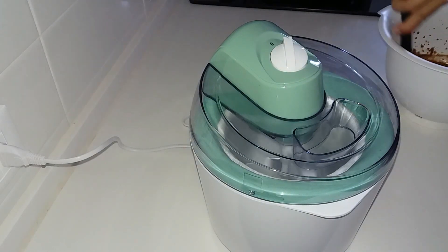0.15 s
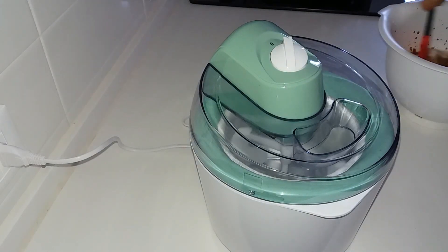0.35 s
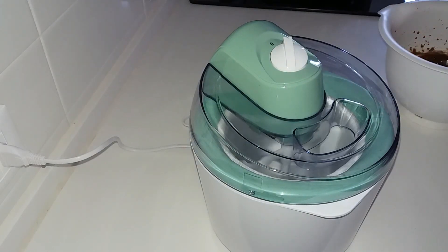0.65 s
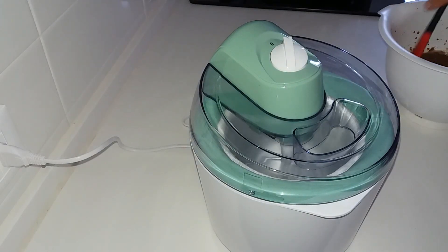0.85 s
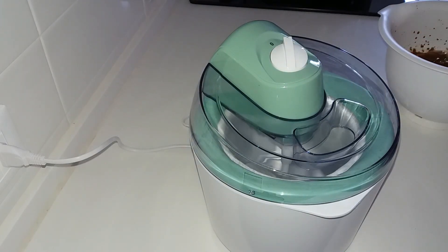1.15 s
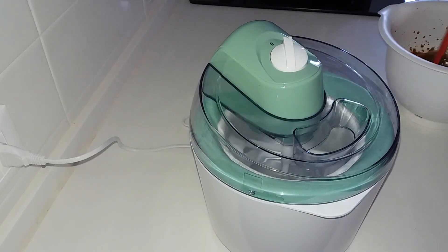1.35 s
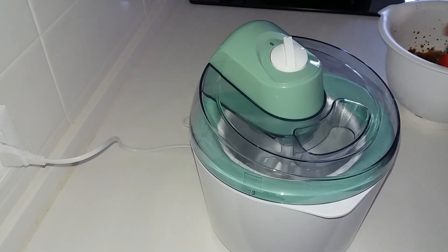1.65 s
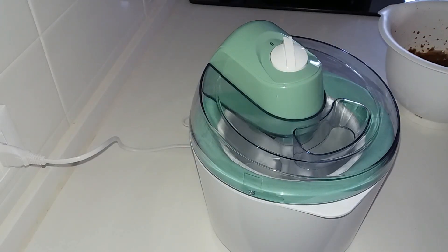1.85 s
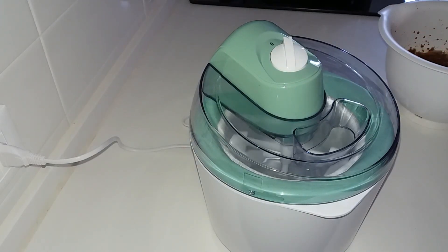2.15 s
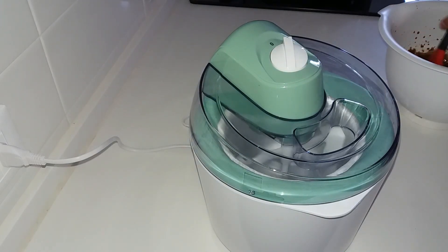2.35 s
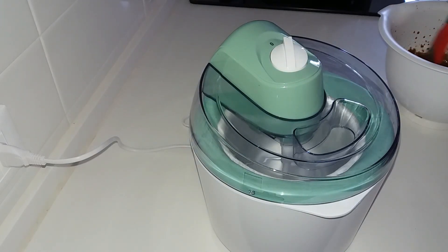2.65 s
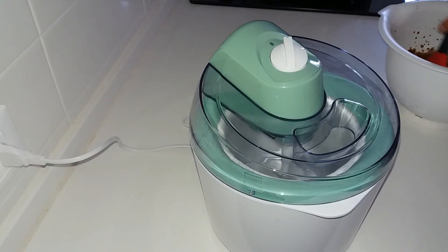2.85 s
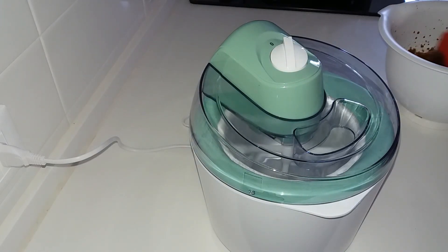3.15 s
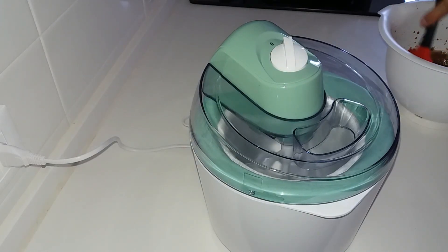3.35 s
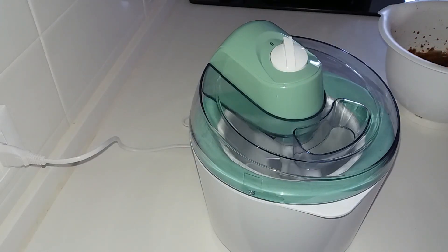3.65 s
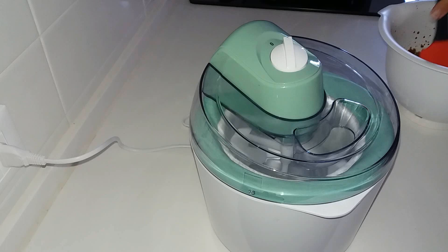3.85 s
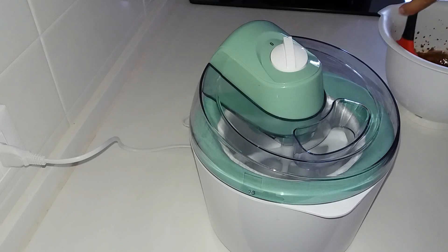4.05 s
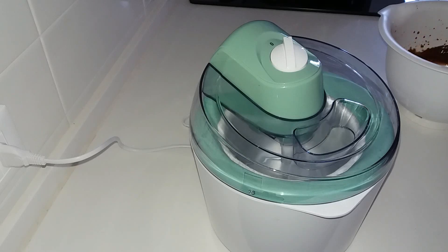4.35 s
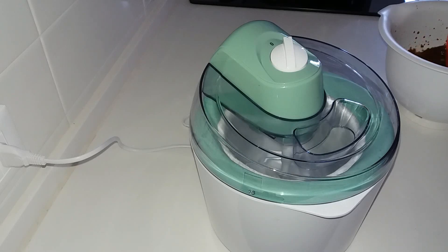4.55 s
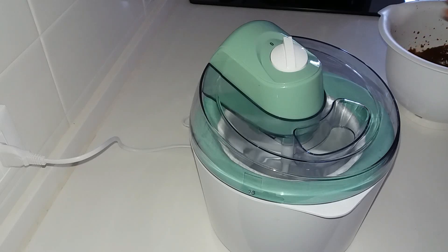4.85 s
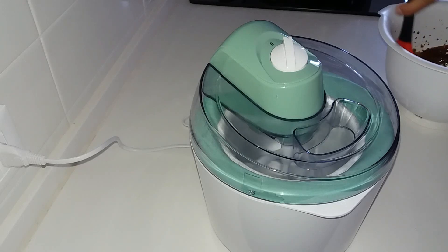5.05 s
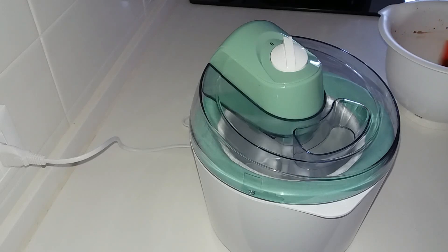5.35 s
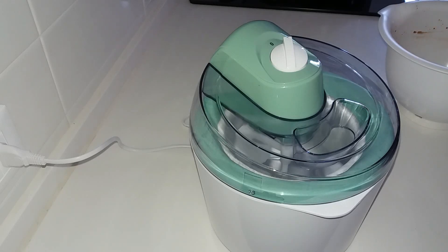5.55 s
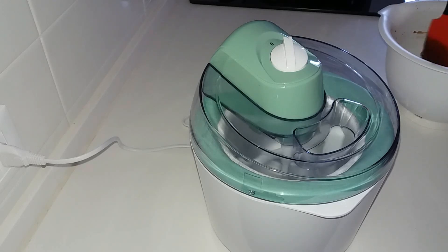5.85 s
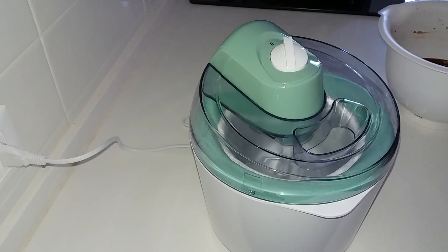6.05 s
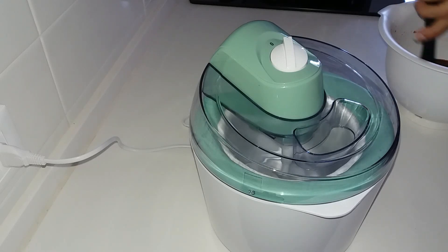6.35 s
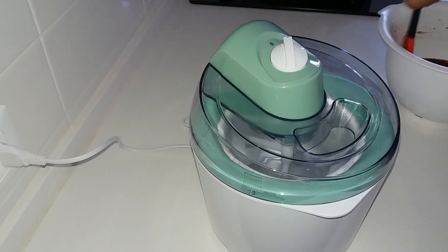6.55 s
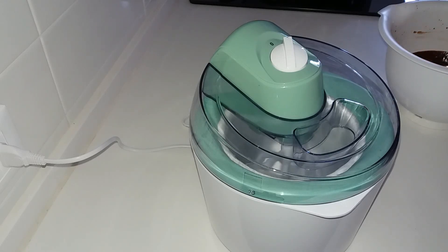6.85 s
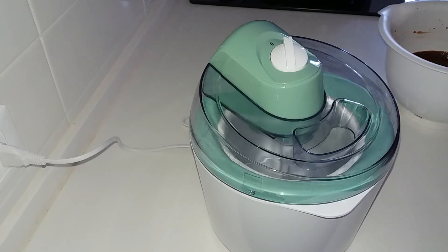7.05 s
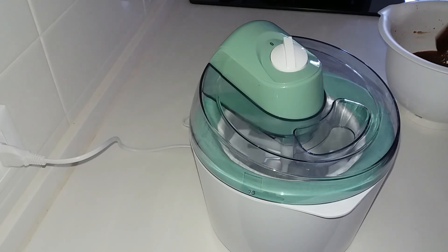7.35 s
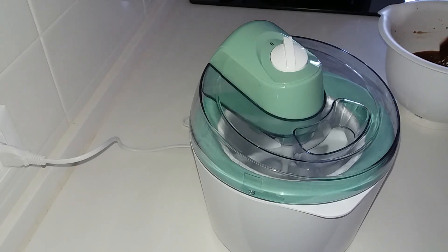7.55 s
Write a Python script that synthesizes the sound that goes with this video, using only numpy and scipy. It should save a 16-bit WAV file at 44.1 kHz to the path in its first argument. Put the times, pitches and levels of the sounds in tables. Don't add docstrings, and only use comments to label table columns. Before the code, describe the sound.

A small kitchen appliance motor hums and whirs steadily with a rattling gear chatter, while a spatula ticks and a bowl thuds softly nearby.

```python
import sys
import numpy as np
from scipy import signal
from scipy.io import wavfile
from scipy.ndimage import uniform_filter1d

SR = 44100
rng = np.random.default_rng(int(sys.argv[2]) if len(sys.argv) > 2 else 0)


def elevation(decibels):
    levels = np.asarray(decibels, float)
    return 10 ** (levels / 20)


def store_wav(level_fs):
    pcm = np.round(np.clip(np.atleast_2d(level_fs), -1, 1) * 32767)
    wavfile.write(sys.argv[1], SR, pcm.T.astype(np.int16))


N = 339334
GEAR_HZ = 10.4


def amp_at(rows, column):
    rows = np.asarray(rows)
    return elevation(np.interp(np.arange(N) / SR, rows[:, 0], rows[:, column]))


def evened(x):
    return x / np.sqrt(np.mean(abs(x) ** 2) + 1e-20)


def band(x, lo_hz, hi_hz):
    return signal.sosfilt(signal.butter(2, [lo_hz, min(hi_hz, SR / 2.1)], "band", fs=SR, output="sos"), x)


def add(mix, s, sound):
    part = mix[round(s * SR):][:len(sound)]
    part += sound[:len(part)]


def wander(top_hz):
    steps = np.arange(0, N + 256, 128)
    z = np.fft.fft(rng.standard_normal((len(steps), 2)) @ [1, 1j])
    lowpass = 1 + (np.fft.fftfreq(len(steps), 128 / SR) / top_hz) ** 4
    z = evened(np.fft.ifft(z / lowpass))
    return np.interp(np.arange(N), steps, z)


def noise(spectrum, patchy_db, body=()):
    hz, (f, db) = np.fft.rfftfreq(2048, 1 / SR), np.transpose(spectrum)
    a, b, patches = rng.standard_normal((N // 512 + 5, 1025, 3)).T
    patches = uniform_filter1d(patches, size=14, axis=0)
    patches = evened(uniform_filter1d(patches, size=5, axis=1))
    colour = np.interp(np.log(hz + 1), np.log(f + 1), db, left=-120, right=-120)
    for centre_hz, width_hz, lift_db in body:
        colour += lift_db / (1 + (2 * (hz - centre_hz) / width_hz) ** 2)
    z = (a + 1j * b) * elevation(colour[:, None] + patchy_db * patches)
    return evened(signal.istft(z, nperseg=2048, noverlap=1536)[1][:N])


def cycles():
    # t/s, f/Hz
    mains = [(0, 49.996), (4, 49.998), (7.7, 50.004)]
    return np.cumsum(np.interp(np.arange(N) / SR, *np.transpose(mains))) / SR


def gear(lag):
    return np.exp(2j * np.pi * (GEAR_HZ * np.arange(N) / SR - lag))


def hum():
    # mains harmonic, level/dB, paddle sideband above, its lag/turns, sideband below, its lag/turns
    harmonics = [(2, -56, 0.31, 0.12, 0.11, 0.3), (4, -44, 0.064, .01, 0.029, 0.12),
                 (5, -38.5, 0.019, 0.23, 0.047, 0.5), (6, -49, .086, 0.32, 0.067, 0.63)]
    # t/s, strength (0-1)
    catches = [(.34, 1), (1.52, 0.7), (1.95, 0.7), (3.0, .4), (3.51, .5), (3.73, 0.8), (4.37, 0.4),
               (5.03, 0.6), (5.4, 0.4), (5.55, 0.6), (6.62, .6), (6.81, 0.8), (7.28, 0.5)]
    # mains harmonic, level/dB
    undertones = [(1, -72.5), (3, -69)]
    # change in a catch in dB, chance sway, gear sway
    catch_dbs, shakes, beats = (5.5, 2, -2, -5), (0.26, 0.1, 0.066, .15), (0.028, .12, 0.082, 0.048)
    catch_s, paddle_hz = 0.043, 0.55
    lead_s, lead_turns = 0.126, 0.062
    t, out = np.arange(N) / SR, np.zeros(N)
    elapsed = cycles() + 0.022 + lead_turns * np.clip((lead_s - t) / 0.025 + .5, 0, 1)
    catch = sum(size * np.exp(-((t - s) / catch_s) ** 2) for s, size in catches)
    paddle = np.exp(2j * np.pi * paddle_hz * t)
    for row, catch_db, shake, beat in zip(harmonics, catch_dbs, shakes, beats):
        k, db, up, up_lag, down, down_lag = row
        sway = 1 + up * paddle * np.exp(-2j * np.pi * up_lag)
        sway += down / paddle * np.exp(-2j * np.pi * down_lag)
        sway += beat * gear(lag=0.047).real + shake * wander(top_hz=12.7)
        carrier = np.exp(2j * np.pi * round(k) * elapsed)
        out += np.sqrt(2) * elevation(db + catch_db * catch) * (sway * carrier).real
    for k, db in undertones:
        out += np.sqrt(2) * elevation(db) * np.cos(2 * np.pi * round(k) * cycles())
    return out


def fridge():
    return np.sqrt(2) * elevation(-60.4) * np.cos(2 * np.pi * (98.494 * np.arange(N) / SR + .27))


def tones():
    # f/Hz, level/dB
    casing_tones = [(350, -72), (400, -72.2), (450, -66), (500, -69.8), (550, -66.4), (600, -68.3),
                    (700, -65.3), (750, -71.6), (800, -68), (850, -72.6), (900, -69.3), (950, -68.4),
                    (1000, -67.5), (1100, -68.8), (1150, -68.2), (1200, -62.8), (1250, -73.8),
                    (1300, -61.5), (1350, -68.1), (1400, -70.7), (1500, -65.0), (1550, -68), (1650, -72),
                    (1750, -69.7), (1800, -59.6), (1900, -62), (2100, -71.7), (2300, -69), (3100, -67.6),
                    (3600, -75.0)]
    out, neighbour = np.zeros(N), 0.29 * gear(lag=0.098)
    elapsed = cycles() - 50 * .0024
    for hz, db in casing_tones:
        sway = 1 + neighbour + .27 * wander(top_hz=6)
        turns = round(hz / 50) * elapsed + min(500 / hz, 1) * rng.random()
        out += np.sqrt(2) * elevation(db) * (sway * np.exp(2j * np.pi * turns)).real
    return out


def slack(drop_db):
    return elevation(drop_db * (.5 - (GEAR_HZ * np.arange(N) / SR - .51) % 1))


def play():
    # turns per gear turn, level/dB, lag/turns
    shafts = [(1 / 20, 1.7, 0.49), (1 / 5, 1.24, 0.093), (1 / 4, 1.7, .45), (1 / 3, 0.53, -0.2)]
    # t/s, level/dB
    drag = [(0, 0), (.3, -1), (.55, 1), (1.0, -1.5), (1.33, 2), (1.8, -0.5), (2.4, 4), (2.9, -1), (3.6, 0),
            (4.3, 3.5), (4.85, 0.5), (5.3, 1), (5.9, 4.5), (6.25, 2), (6.7, 1.3), (7.1, 0.5), (7.5, 4),
            (7.69, 3.5)]
    # t/s, level/dB
    judders = [(.5, 2), (.57, 10), (1.33, 0), (2.12, 3), (2.41, 5), (2.55, 9), (2.84, -5), (2.96, -1),
               (4.05, 6), (4.3, 3), (4.39, 0), (4.86, 4), (5.16, 0), (5.48, 2), (5.6, 2), (6.235, 11),
               (6.53, 6.5), (6.72, 1), (6.79, 2), (7.11, 7), (7.39, 2), (7.54, 10)]
    mean_db, loose_db, judder_s = 1.5, 1.3, 0.019
    t = np.arange(N) / SR
    shafts_db = sum(db * np.cos(2 * np.pi * (ratio * GEAR_HZ * t - lag)) for ratio, db, lag in shafts)
    judder_db = sum(db * np.exp(-((t - s) / judder_s) ** 2) for s, db in judders)
    chance_db = loose_db * wander(top_hz=5.2).real
    return elevation(mean_db + shafts_db + judder_db + chance_db) * amp_at(drag, 1)


def ring(pitch):
    # f/Hz, level/dB, t60/s
    casing = [(1060, -8, 0.026), (1326, -9.5, 0.18), (1540, -13, 0.11), (1883, 5, 0.026),
              (1930, -22, 0.0055), (1560, 8.5, 0.0015), (2305, -3.5, 0.094), (2715, 14, 0.0073),
              (3117, -1, 0.033)]
    t = np.arange(4000) / SR
    x = sum(elevation(db - 60 * t / t60) * np.sin(2 * np.pi * hz * pitch * t) for hz, db, t60 in casing)
    x = signal.sosfilt(signal.butter(6, 3400, fs=SR, output="sos"), x)
    return x / abs(x).max()


def rattle(gap):
    # delay t/s, mean level/dB, scatter/dB, casing pitch factor
    knocks = [
        (.0021, 0, 3, 1.0),
        (.0112, -2, 3, .9),
        (.0046, -9, 3, .95),
        (.0142, -9, 3, 1.05),
    ]
    # t/s, peak level/dB
    hard = [(0.162, -41), (0.4813, -40), (0.5417, -40), (1.121, -32), (1.3229, -28), (1.3907, -35),
            (2.3003, -33), (2.43, -34), (2.46, -35), (2.833, -25.5), (2.9312, -35), (2.981, -34),
            (3.4216, -34), (3.8715, -30), (4.0025, -35), (4.022, -35), (4.2213, -29.5), (4.2825, -27.5),
            (4.3819, -38), (4.4017, -30), (4.862, -35), (5.143, -29.5), (5.623, -29.5), (6.2103, -41),
            (6.302, -39), (6.701, -40), (6.781, -37), (7.0614, -34), (7.3803, -34), (7.5303, -33)]
    starts, out = np.flatnonzero(np.diff(np.floor(cycles()))), np.zeros(N)
    force = slack(drop_db=13) * gap ** 1.2
    for delay, db, scatter_db, pitch in knocks:
        late, size = np.clip(rng.standard_normal((2, len(starts))), -2, 2)
        blows = np.zeros(N + 2000)
        blows[(starts + (delay + .00008 * late) * SR).astype(int)] = elevation(db + scatter_db * size)
        blows = np.minimum(blows[:N] * force, 4.0)
        out += signal.oaconvolve(blows, ring(pitch))[:N]
    out = elevation(-53) * evened(out)
    knock = ring(1.0)
    for s, db in hard:
        add(out, s, elevation(db + 2) * knock)
    return out


def whirr(gap):
    # f/Hz, level/dB per Hz
    spectrum = [(26, -62), (45, -52), (96, -6), (144, -12), (176, -12), (250, 1), (318, -25), (355, -11),
                (877, -18), (1320, -6), (1420, -9), (1840, -11.5), (2050, -12), (3080, -18), (3700, -25.5),
                (4810, -64), (8140, -120)]
    # f/Hz, width/Hz, lift/dB
    resonances = [(811, 40, 11.5), (1034, 114, 7), (1272, 90, -17), (1320, 97, 8.5), (1416, 40, -7),
                  (1613, 89, 2.5), (1924, 38, 6.5), (1990, 64, -4.5), (2330, 79, 4), (2424, 32, -16),
                  (2465, 50, 6.5), (2840, 120, 2.5), (3130, 29, 12), (3620, 63, 9)]
    load = gap ** .25 * slack(drop_db=3)
    return elevation(-49) * noise(spectrum, patchy_db=0.3, body=resonances) * load


def hiss():
    # f/Hz, level/dB per Hz
    spectrum = [(2180, -63), (3700, -25), (3860, -16.5), (4360, -2), (4980, 2), (5450, -3), (6190, -15.5),
                (6990, -18), (8650, -30), (15800, -37)]
    return elevation(-46.5) * noise(spectrum, patchy_db=0.78)


def electronics():
    return np.sqrt(2) * elevation(-86) * np.sin(2 * np.pi * 15659 * np.arange(N) / SR)


def opening_hiss():
    # t/s, level/dB
    swell = [
        (0, -58),
        (.05, -56),
        (.125, -50.5),
        (.132, -90),
    ]
    return amp_at(swell, 1) * evened(band(rng.standard_normal(N), 2500, 8500))


def ticks():
    # t/s, body peak level/dB, body f/Hz, treble peak level/dB, t60/s
    edges = [
        (.129, -50, 6000, -54, .015),
        (0.557, -44, 2500, -56, .04),
        (2.186, -36, 900, -45, 0.05),
        (2.512, -25, 2200, -44, 0.062),
        (2.513, -31, 3870, -70, 0.066),
        (2.644, -46, 3000, -60, 0.05),
        (4.852, -24, 3600, -66, 0.019),
    ]
    puff_db, ping_db, ping_share = -5.5, -3, .7
    out, t = np.zeros(N), np.arange(SR // 3) / SR
    for s, mid_db, hz, treble_db, t60 in edges:
        puff = rng.standard_normal(len(t))
        mid = band(band(puff, hz / 2.4, hz * 1.4), hz / 2.4, hz * 1.4)
        treble = band(puff, 3400, 7400)
        edge = elevation(mid_db + puff_db) * evened(mid) + elevation(treble_db) * evened(treble)
        edge += elevation(mid_db + ping_db - 60 * ping_share * t / t60) * np.sin(2 * np.pi * hz * t)
        add(out, s, edge * elevation(-60 * t / t60) * (1 - np.exp(-t / .0012)))
    return out


def thuds():
    # t/s, peak level/dB, low modes level/dB, high mode level/dB, t60/s
    bumps = [(1.016, -34.5, -8, 3, 0.18), (1.048, -46, -10, -3, 0.18), (1.172, -41.5, -5, -9, 0.19),
             (1.716, -40, -7, -6, 0.14), (2.189, -42, -15, 3, 0.24), (2.521, -32, -12, -9, 0.16),
             (3.02, -28.5, -9, -12, 0.11), (3.604, -37, -3, -4, 0.17), (4.026, -40, -9, -2, 0.2),
             (4.856, -31, -7, -3, 0.12), (6.235, -32.5, -18, -15, 0.17)]
    counter_hz = (67.4, 90.4, 117, 131.5)
    out, t = np.zeros(N), np.arange(SR // 3) / SR
    low, lower_mid, main, high = np.sin(2 * np.pi * np.outer(counter_hz, t))
    for s, db, low_db, high_db, t60 in bumps:
        modes = elevation(low_db) * (low + 0.32 * lower_mid) + main + elevation(high_db) * high
        add(out, s - .004, elevation(db + 4 - 60 * t / t60) * (1 - np.exp(-t / 0.0083)) ** 2 * modes)
    return band(out, 52, 170)


def taps():
    # t/s, peak level/dB, f/Hz, t60/s, side modes level/dB
    strokes = [
        (2.185, -28.5, 446, 0.048, 4),
        (2.209, -42, 452, 0.081, -4),
        (2.244, -34.5, 482, 0.098, -6),
        (2.32, -34.5, 415, 0.07, 0),
        (2.515, -26, 555, 0.052, -3),
        (3.022, -36, 612, 0.11, -10),
        (3.63, -44, 433, 0.077, -1),
        (4.851, -43, 710, 0.1, -3),
    ]
    out, t = np.zeros(N), np.arange(SR // 3) / SR
    for s, db, hz, t60, side_db in strokes:
        shares = [(1, 0.65), (1.41, 0.6 * elevation(side_db)), (0.96, 0.5 * elevation(side_db))]
        modes = sum(share * np.sin(2 * np.pi * hz * ratio * t) for ratio, share in shares)
        add(out, s, elevation(db - 1.0 - 60 * t / t60) * (1 - np.exp(-t / 0.0039)) * modes)
    return out


def scene():
    gap = play()
    motor = hum() + fridge() + tones() + rattle(gap) + whirr(gap) + hiss()
    mono = motor + electronics() + opening_hiss() + ticks() + thuds() + taps()
    return np.array([mono, mono])


def low_pass(x):
    return signal.sosfilt(signal.butter(12, 15910, fs=SR, output="sos"), x)


def record(dry):
    cut = signal.sosfilt(signal.butter(2, 22, "high", fs=SR, output="sos"), dry)
    edge = signal.firwin(1023, 15790, window=("kaiser", 6), fs=SR)
    mix = signal.oaconvolve(cut, edge[None], "same") - .0007
    return low_pass(mix)


dry = scene()
out = record(dry)
store_wav(out)
```